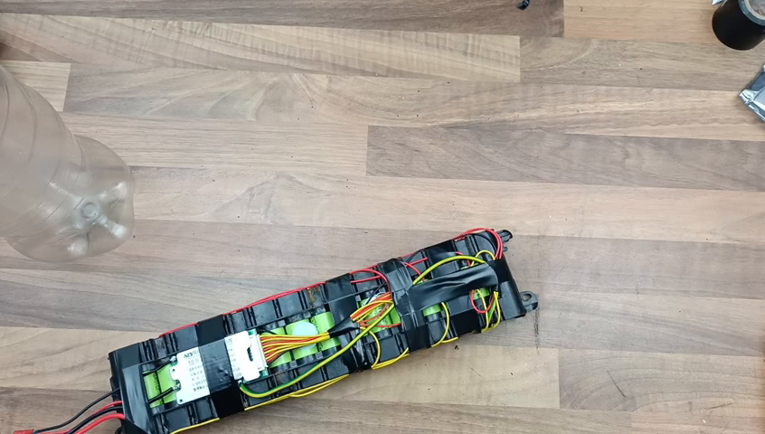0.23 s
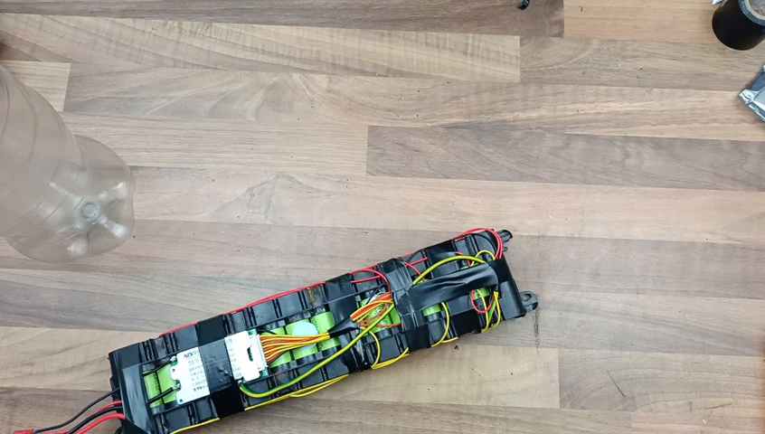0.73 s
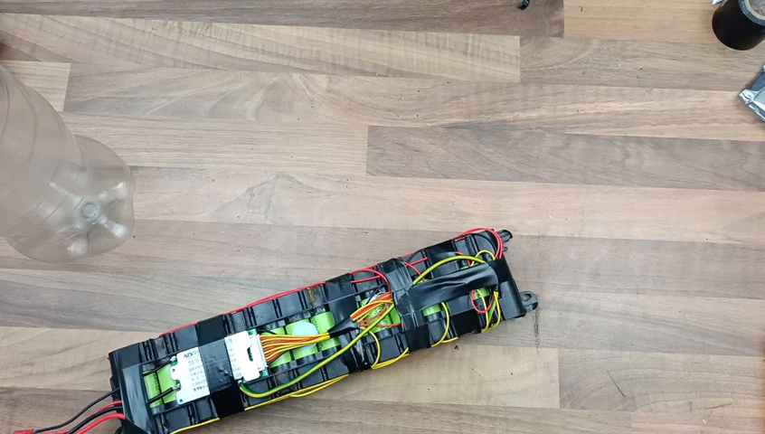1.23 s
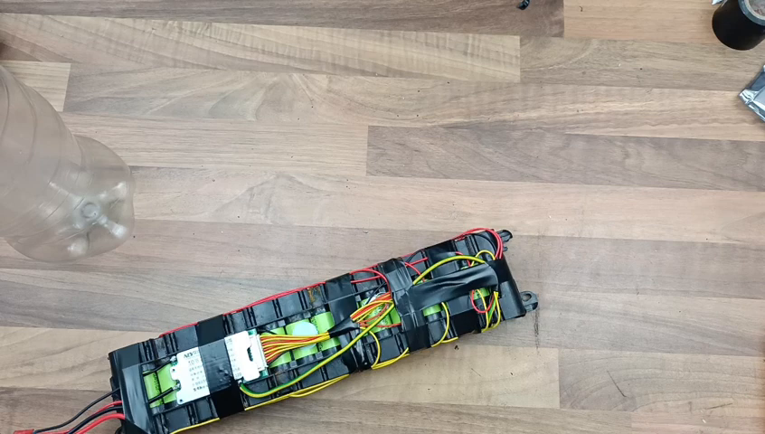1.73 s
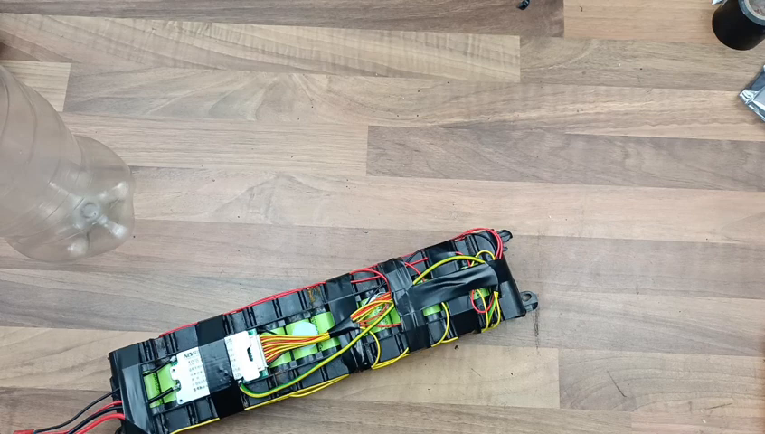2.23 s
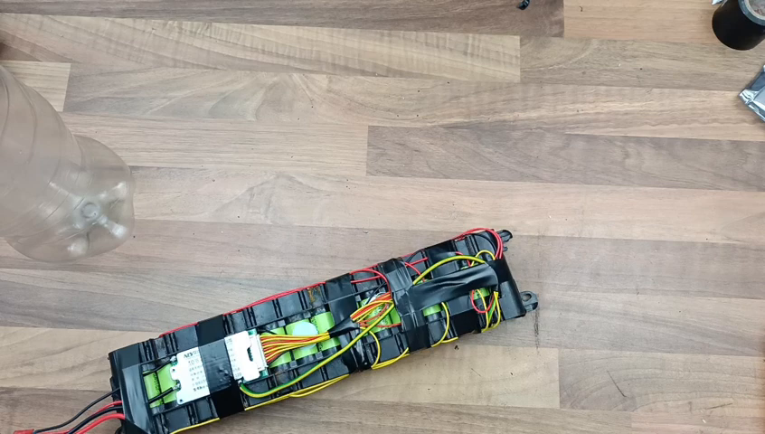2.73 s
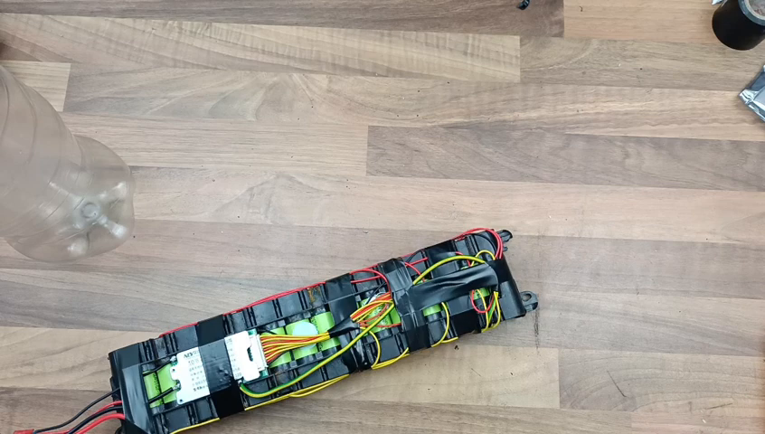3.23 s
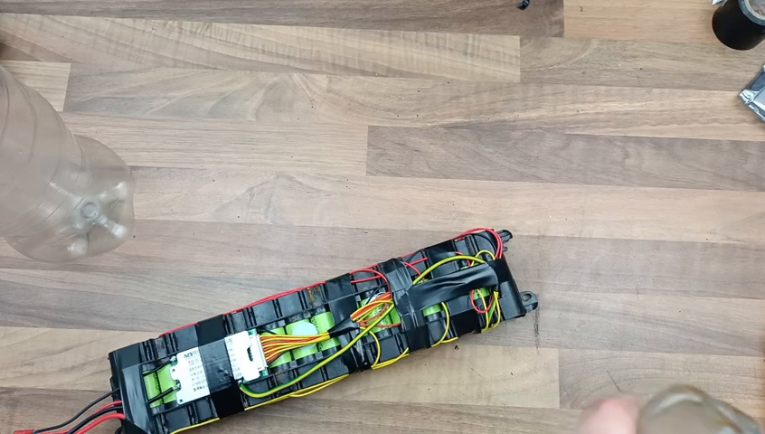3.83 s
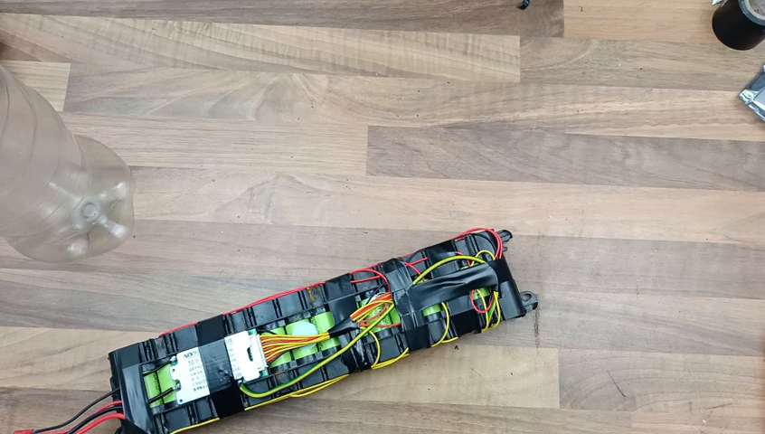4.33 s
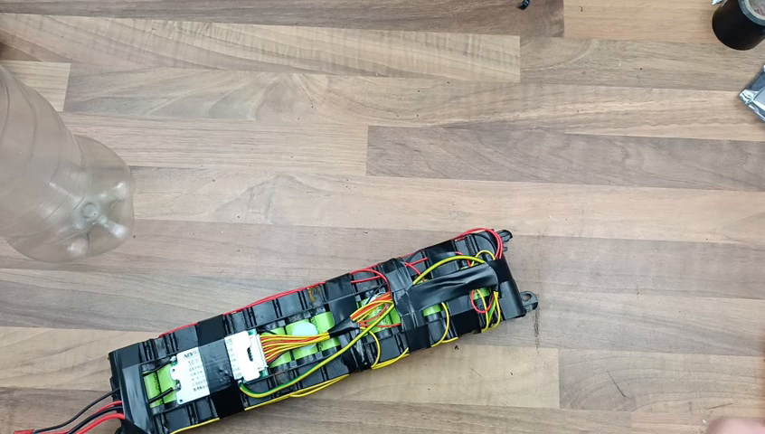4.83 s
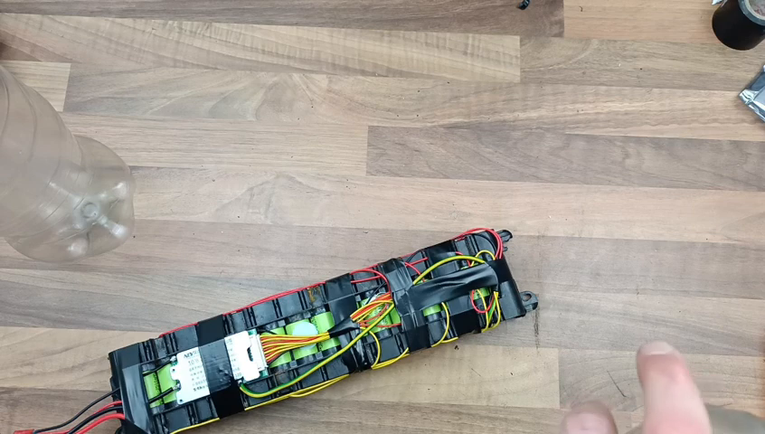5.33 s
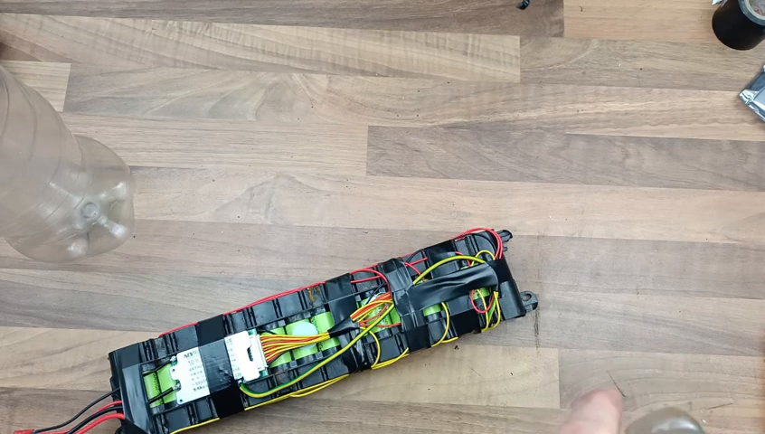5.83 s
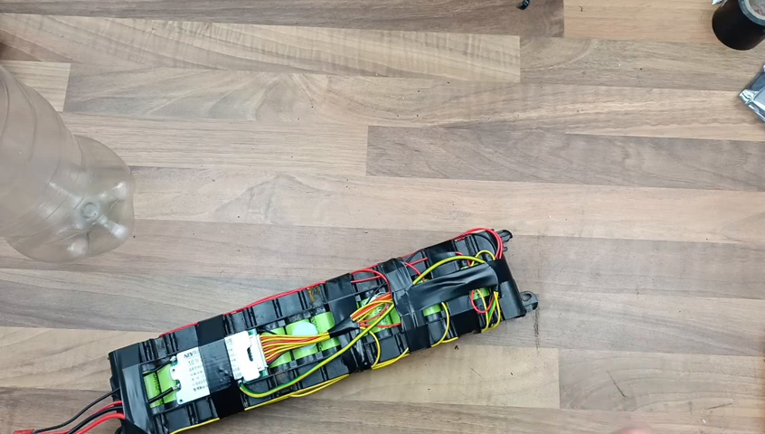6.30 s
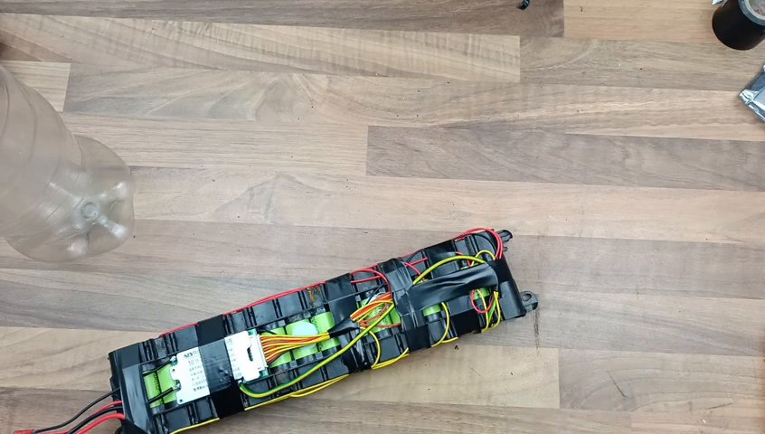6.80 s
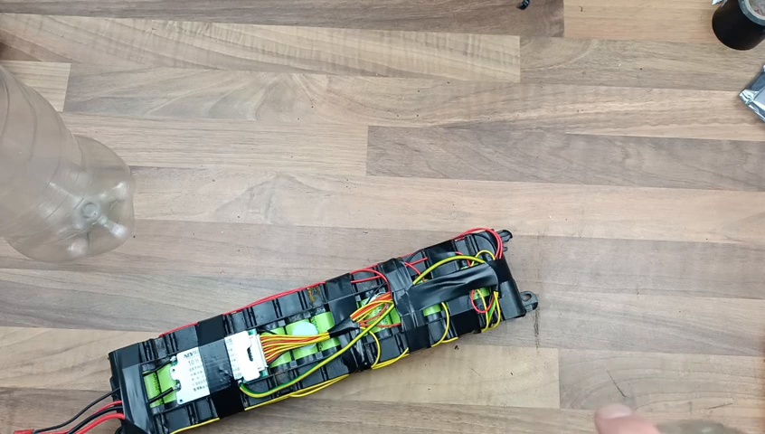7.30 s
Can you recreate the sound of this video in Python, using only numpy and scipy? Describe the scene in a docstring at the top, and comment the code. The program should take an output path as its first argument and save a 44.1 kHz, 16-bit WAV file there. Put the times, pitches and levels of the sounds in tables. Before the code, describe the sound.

A hand squeezes a thin plastic bottle close by, dents cracking sharply and popping hollow in irregular bursts, with crinkly rubbing and quiet gaps between.

```python
"""Squeezing a thin plastic bottle

A hand squeezes the bottle a little to the right of two microphones in a small, quiet room.
Dents snap in and out: dying wall tones crack, the belly booms, filtered noise fizzes.
Random tiny slips make the rubbing and creaking of fingers; some dents also puff low air.
Sparse echoes give a short tail, over a drifting noise hush and faint steady tones."""
import sys
import numpy as np
from scipy import signal
from scipy.fft import rfft, irfft, next_fast_len
from scipy.io import wavfile
from scipy.ndimage import uniform_filter1d

SR = 44100
rng = np.random.default_rng(int(sys.argv[2]) if len(sys.argv) > 2 else 0)


def voltage_ratio(decibels):
    """Convert decibels (scalar or array-like) to amplitude ratios, 20 dB per decade."""
    exponent = np.asarray(decibels, float) / 20
    return 10 ** exponent


def transcribe(signal):
    """Save signal, clipped to [-1, 1], as a 16-bit WAV file at the path in sys.argv[1]."""
    frames = np.atleast_2d(signal).T
    limited = np.clip(frames, -1, 1)
    pcm = np.round(limited * 32767).astype(np.int16)
    wavfile.write(sys.argv[1], SR, pcm)


N = 333396  # length of the scene in samples
ONSET = 350  # samples at the start of a snap or puff that set its level


def evened(x, size=None):
    """Scales to rms 1 over the first size samples."""
    return x / np.sqrt(np.mean(x[..., :size] ** 2) + 1e-20)


def read(points, hz):
    """Reads a table between its points on a log-frequency axis."""
    point_hz, value = np.transpose(points)
    return np.interp(np.log(hz + 1), np.log(point_hz + 1), value)


def colour(x, points):
    """Makes some pitches louder and others softer, by a table of (pitch_hz, level_db)."""
    length = x.shape[-1]
    size = next_fast_len(length)
    gain = voltage_ratio(read(points, np.fft.rfftfreq(size, 1 / SR)))
    return irfft(rfft(x, size) * gain, size)[..., :length]


def rise(t, s):
    """Smooth start over s seconds."""
    return np.sin(np.pi / 2 * np.minimum(t / s, 1)) ** 2


def ring(hz, db, t60, phase, t):
    """Sums dying tones, each falling 60 dB in t60 seconds; phase has one row a microphone."""
    turning = np.exp(np.outer(2j * np.pi * hz - np.log(1000) / t60, t))
    return ((voltage_ratio(db) * np.exp(1j * phase)) @ turning).imag


def without_bass(x):
    """Takes away the deep bass below about 150 Hz."""
    return signal.sosfilt(signal.butter(2, 150, "high", fs=SR, output="sos"), x)


def add(mix, s, sound):
    """Mixes a two-channel sound in at time s."""
    part = mix[:, round(s * SR):][:, :sound.shape[1]]
    part += sound[:, :part.shape[1]]


# colour of the hush: pitch_hz, level_db (relative, per Hz)
HUSH_COLOUR = [(18, -41.5), (30, -14.5), (100, 1.5), (160, -9.5), (500, -11.5), (900, -12.5), (1300, -19),
               (3300, -27.5), (4300, -32.5), (7300, -41), (8520, -34), (11500, -37.5), (15000, -43.5),
               (16200, -53.5)]
# how alike the hush is left and right: pitch_hz, likeness (-1 to 1)
HUSH_LIKENESS = [(60, -0.4), (300, 0.24), (1400, -0.13)]
# faint steady tones of electronics: pitch_hz, level_db
WHINE = [(8263, -93), (8800, -97), (9400, -95), (10643, -96)]


def quiet_air():
    """The hush of the room is noise with drifting patches; electronics add faint steady tones."""
    hush_db = -63.5
    frames, hz = N // 256 + 5, np.fft.rfftfreq(1024, 1 / SR)
    a, b, c, d, patches = rng.standard_normal((frames, 513, 5)).T
    # smoothing over pitch, then over time, turns single dots into patches
    patches = evened(uniform_filter1d(uniform_filter1d(patches, 12, 0), 14, 1))
    same = np.clip(read(HUSH_LIKENESS, hz), -1, 1)[:, None]
    left = a + 1j * b
    right = same * left + np.sqrt(1 - same ** 2) * (c + 1j * d)
    gain = voltage_ratio(read(HUSH_COLOUR, hz)[:, None] + 2.0 * patches)
    hush = signal.istft(np.array([left, right]) * gain, nperseg=1024, noverlap=768)[1][:, :N]
    t = np.arange(N) / SR
    tones = sum(voltage_ratio(db) * np.sqrt(2) * np.sin(2 * np.pi * f * t) for f, db in WHINE)
    return voltage_ratio(hush_db) * evened(hush) + tones


def slips(per_s, spread_db, clumps):
    """Tiny random stick-slips in clumps, a few much larger, some heard on both sides, some on one."""
    spread = np.minimum(rng.exponential(1, (3, N)), 4)
    size = voltage_ratio(spread_db * spread) * rng.choice([-1., 1.], (3, N))
    both, *own = size * (rng.random((3, N)) < clumps * per_s / SR)
    return both + 1.2 * np.array(own)


# the bottle's belly and the air in it, before damping and detuning: pitch_hz, level_db, t60_s
BELLY = [(271, -0.5, 0.26), (278.8, 1.5, 0.94), (337, 9.5, 0.13), (430, 4.5, 0.12), (642, 3, 0.02),
         (651, 9, 0.096), (870, 2.5, 0.17), (789.6, 7, 0.17), (1010, 1, 0.15), (1140, -1.5, 0.092)]
# colour of slips of the broad panels: pitch_hz, level_db
CREAK = [(600, -27), (900, 0.5), (1500, 0), (2200, -10.5), (4000, -36.5)]
# colour of slips of the tight creases: pitch_hz, level_db
CRUNCH = [(1200, -7.5), (2200, 1.5), (2900, 5.5), (3800, -2.5), (4500, -7), (7000, -29)]
# colour of the finest crackle, in rubs and snaps: pitch_hz, level_db
FIZZ = [(2650, -24.5), (4500, -1.5), (6490, -6), (7370, -3.5), (9020, -4.5), (11200, -20), (14800, -18.5),
        (16000, -29.5)]
# strokes of the fingers: peak_s, effort_db, hiss_db, swell_s, fade_s
STROKES = [(0.305, -19.5, -39.5, 0.083, 0.11), (1.214, -36.5, -81, 0.0061, 0.08),
           (1.342, -51, -66, 0.037, .03), (1.384, -46, -69.5, 0.1, 0.054), (1.28, -56, -62.5, .03, 0.046),
           (1.49, -56.5, -80.5, 0.094, 0.19), (1.61, -59, -90, .03, 0.038), (2.019, -29, -50.5, 0.03, .02),
           (2.282, -51, -83, 0.15, 0.026), (2.69, -49.5, -72, 0.22, 0.047),
           (3.287, -19, -36.5, 0.0096, 0.14), (4.171, -37, -74, 0.024, .3), (4.249, -43.5, -62, 0.17, .25),
           (4.398, -37, -58, 0.048, 0.17), (4.507, -42, -50, 0.024, 0.17), (4.787, -27, -35, 0.01, .12),
           (4.9, -40, -70, .15, .15), (4.967, -35, -61.5, 0.13, .01), (5.102, -38, -46, 0.015, 0.22),
           (5.158, -31, -54, 0.075, .1), (6.15, -30, -58, 0.057, 0.033), (6.301, -29, -53, 0.027, .11),
           (6.415, -36, -58, 0.067, .035), (6.469, -25, -47, 0.026, 0.15), (6.507, -19.5, -35, 0.046, .1),
           (6.55, -18, -37.5, 0.066, 0.089), (6.208, -50, -86.5, 0.02, 0.039),
           (5.828, -33.5, -69.5, 0.017, 0.069), (6.76, -40.5, -71, 0.089, .07),
           (6.935, -35.5, -58.5, 0.13, .01), (6.992, -28.5, -50, 0.013, 0.34),
           (7.149, -25, -44.5, 0.25, .3), (7.393, -22, -53, 0.047, .1), (7.451, -20, -32, 0.11, 0.13)]


def rubbing():
    """Slips of skin and plastic drive the belly, the panels, the creases and a dry hiss."""
    t, tap_t = np.arange(N) / SR, np.arange(4000) / SR
    # one crease sets off the next
    clumps = np.exp(0.45 * evened(uniform_filter1d(rng.standard_normal(N), 250)))

    # a slip rings the belly for a quarter of its full time, with its high notes favoured
    belly_hz, db, t60 = np.transpose(BELLY)
    tilted_db = db + 3 * np.log2(belly_hz / 600)
    belly_tap = ring(belly_hz, tilted_db, 0.25 * t60, np.zeros((1, len(BELLY))), tap_t)
    belly_tap = belly_tap * rise(tap_t, 0.002)
    belly_slips = slips(200, 4, clumps).sum(0)[None]
    belly = evened(signal.oaconvolve(belly_slips, belly_tap)[:, :N])
    creak = evened(colour(slips(800, 4.5, clumps), CREAK))
    crunch = evened(colour(slips(1600, 4.5, clumps), CRUNCH))
    hiss = evened(colour(slips(4200, 2.0, clumps), FIZZ))

    # the hand never lies quite still on the plastic
    effort, hissing = np.full(N, voltage_ratio(-71)), np.full(N, voltage_ratio(-91.5))
    for peak_s, effort_db, hiss_db, swell_s, fade_s in STROKES:
        span = slice(round((peak_s - 2 * swell_s) * SR), round((peak_s + 2 * fade_s) * SR))
        away = np.maximum((peak_s - t[span]) / swell_s, (t[span] - peak_s) / fade_s) ** 1.24
        # one swelling or fading time from its peak, a stroke is down by these dB
        effort[span] = np.hypot(effort[span], voltage_ratio(effort_db - 30.5 * away))
        hissing[span] = np.hypot(hissing[span], voltage_ratio(hiss_db - 41 * away))

    # a dry, bright rub works the creases; a dull one rocks the belly
    dry_db = 20 * np.log10(hissing / effort) + 23.2
    stroke = belly * voltage_ratio(-7.0 - 0.41 * dry_db)
    stroke = stroke + creak * voltage_ratio(-9.5)
    stroke = stroke + crunch * voltage_ratio(-10.5 + 0.57 * dry_db)
    return without_bass(stroke * effort + hiss * hissing)


def wall_crack(crack_hz, t):
    """A flipping dent shakes the many tones of the thin wall that lie round its own pitch."""
    place, size, turn, skew = rng.standard_normal((4, 90))
    modes_hz = np.geomspace(650, 7000, 90) * np.exp(0.024 * place)
    octaves = np.log2(modes_hz / crack_hz)
    far_db = np.where(octaves > 0, 9.0, 7.0) * octaves ** 2 - 1.1 * octaves
    db = 2.2 * size - 26 * np.tanh(far_db / 26)  # the drop levels off at 26 dB
    # the two microphones see each tone a little differently
    phase = 0.75 * turn + 0.79 * np.outer([1, -1], skew)
    crack = ring(modes_hz, db, 0.039 * (2000 / modes_hz) ** 0.087, phase, t)
    crack = crack * rise(t, 1.32 / crack_hz)  # big dents flip slowly
    return crack * (1 + 5.3 * np.exp(-t / 0.00025))  # the flip itself is a sharp spike


def belly_boom(boom_hz, t):
    """A snap sets the belly and its air ringing, strongest near boom_hz."""
    detune, size, turn, skew = rng.standard_normal((4, len(BELLY)))
    belly_hz, db, t60 = np.transpose(BELLY)
    # the squeezed shape detunes the belly, its lowest notes least
    belly_hz = belly_hz * np.exp(0.05 * np.tanh(belly_hz / 600) ** 2 * detune)
    db = db + 2.5 * size - 16 * np.log2(belly_hz / boom_hz) ** 2
    phase = 1.9 * turn + 0.03 * np.outer([1, -1], skew)
    belly = ring(belly_hz, db, t60, phase, t) * rise(t, 0.54 / boom_hz)
    return belly * (1 + 4.0 * np.exp(-t / 0.0065))  # the gripping hand soon damps the boom


def crease_fizz(t):
    """Creases fizz as bright noise that dies fast, then slower."""
    both, left, right = rng.standard_normal((3, len(t)))
    fade = voltage_ratio(-60 * t / 0.033) + 0.25 * voltage_ratio(-60 * t / 0.092)
    return colour((both + 6.3 * np.array([left, right])) * fade, FIZZ)


def snap(crack_db, crack_hz, belly_db, boom_hz, fizz_db):
    """A dent flips: its wall cracks, the belly booms, creases fizz."""
    t = np.arange(3000) / SR
    sound = voltage_ratio(crack_db) * evened(wall_crack(crack_hz, t), ONSET)
    sound = sound + voltage_ratio(belly_db) * evened(belly_boom(boom_hz, t), ONSET)
    sound = sound + voltage_ratio(fizz_db) * evened(crease_fizz(t), ONSET)
    return without_bass(sound * rise(t[::-1], 0.012))  # fades out smoothly at the end


# dents cracking sharply: start_s, crack_db, dent_hz, belly_db, fizz_db
CRACKS = [(0.0027, -9.5, 1523, -9, -30), (0.2544, -17.5, 2587, -33, -40), (0.2739, -9.5, 2326, -20.5, -19),
          (0.2905, -24.5, 2950, -41, -43.5), (0.3061, -12.5, 2473, -39.5, -22),
          (0.319, -15.5, 2677, -16.5, -30.5), (0.469, -15.5, 2175, -28.5, -25.5),
          (0.535, -19, 2315, -48.5, -58), (0.669, -15, 2342, -22, -17), (0.71, -22.5, 1260, -19, -31),
          (0.743, -24.5, 1525, -30, -44.5), (0.9022, -18.5, 1600, -22.5, -48.5),
          (1.1179, -12.5, 2470, -32, -42.5), (1.1967, -30, 880, -27, -74), (1.763, -26.5, 2037, -29.5, -47),
          (1.769, -21, 1490, -32, -60), (1.7995, -29, 1620, -30.5, -75.5), (2.324, -17, 2510, -23, -22),
          (3.179, -65.5, 2490, -66.5, -89.5), (3.239, -12, 2400, -20, -32), (3.2705, -9.5, 2392, -17, -22),
          (3.422, -21.5, 885, -26, -67), (3.446, -13, 2803, -30, -27.5), (3.5103, -7.5, 2333, -53, -27),
          (3.6539, -10, 2265, -22, -51.5), (3.6774, -11.5, 1600, -51, -43.5),
          (3.6943, -15.5, 1910, -24.5, -58), (3.908, -60.5, 2200, -66, -74),
          (4.088, -57, 2180, -54.5, -76.5), (4.1559, -36, 1050, -38, -71.5),
          (4.2374, -24.5, 1760, -31.5, -49.5), (4.319, -42.5, 2480, -41.5, -56),
          (4.4893, -15.5, 1006, -17.5, -58.5), (4.507, -44.5, 2960, -48.5, -37.5),
          (4.634, -15, 2906, -21.5, -20), (4.674, -11.5, 2782, -24, -18), (4.7076, -27, 2210, -36, -47),
          (4.7252, -15.5, 2128, -30.5, -25.5), (4.7353, -21.5, 2218, -39.5, -40),
          (4.7721, -17.5, 2580, -32, -26), (4.9413, -41.5, 1840, -53, -57.5),
          (4.9773, -11, 1833, -25.5, -34.5), (5.0036, -19, 2970, -23.5, -31),
          (5.0164, -12.5, 1710, -20.5, -29), (5.061, -12.5, 2332, -23.5, -23.5),
          (5.0697, -20.5, 2890, -41, -28.5), (5.149, -30.5, 1137, -45, -70), (5.159, -25.5, 1094, -40, -70),
          (5.1739, -14.5, 1250, -55, -54), (5.249, -13, 2700, -49.5, -20), (5.261, -11.5, 1857, -26, -27),
          (5.388, -13.5, 1082, -22.5, -58), (5.433, -31, 2483, -59.5, -43.5), (5.4433, -34, 2543, -49, -37),
          (5.466, -5.5, 2185, -22, -30.5), (5.4836, -10.5, 1674, -45, -20.5),
          (5.491, -18, 1935, -18, -24.5), (5.8199, -42, 2690, -53, -65), (6.293, -26.5, 2480, -25, -51),
          (6.2985, -43.5, 2685, -33.5, -58.5), (6.319, -26.5, 1316, -32, -65.5),
          (6.3296, -29, 2260, -34, -61), (6.456, -40, 1250, -37, -71), (6.4645, -32, 1000, -43, -66),
          (6.4972, -24, 2830, -46, -42.5), (6.511, -34, 2870, -48, -51.5), (6.5325, -17, 2500, -34, -45),
          (6.548, -28.5, 3300, -36, -47), (6.798, -66, 2520, -60, -62), (6.851, -62, 2030, -55, -55),
          (6.923, -39, 1470, -46, -52), (6.9501, -11.5, 2284, -21.5, -28),
          (6.9629, -10.5, 1532, -36, -34.5), (7.089, -7.5, 1530, -27, -33),
          (7.1007, -14, 2060, -44.5, -24.5), (7.1184, -19, 2094, -35, -44.5),
          (7.1301, -20.5, 1867, -29, -30), (7.2105, -16.5, 3820, -27, -26.5),
          (7.2871, -11, 1193, -25.5, -54.5), (7.412, -25.5, 2212, -29, -35.5),
          (7.4803, -13, 2755, -19, -19.5)]


def add_cracks(bottle):
    """Sharp dents crack at their own pitch while the belly booms round 493 Hz."""
    for start_s, crack_db, dent_hz, belly_db, fizz_db in CRACKS:
        add(bottle, start_s, snap(crack_db, dent_hz, belly_db, 493, fizz_db))


# broad panels popping with a dull knock: start_s, belly_db, boom_hz, tick_db
KNOCKS = [(0.0441, -14.5, 493, -27), (0.288, -21.5, 750, -38), (0.3057, -11, 740, -37),
          (0.4902, -19.5, 530, -24.5), (1.0825, -39.5, 327, -50), (1.8689, -43.5, 430, -63.5),
          (2.026, -27.5, 650, -37), (2.249, -52.5, 600, -64), (2.3007, -28.5, 465, -39),
          (2.5452, -42.5, 430, -55.5), (2.588, -49, 320, -70), (2.6611, -46, 490, -56),
          (2.696, -46.5, 430, -52), (3.0484, -34.5, 343, -53), (3.122, -47.5, 350, -50),
          (3.352, -22.5, 310, -26), (3.6275, -34.5, 300, -41), (3.817, -47, 403, -47),
          (4.1797, -22.5, 327, -39), (4.2563, -27, 322, -34), (4.438, -35.5, 330, -50.5),
          (4.477, -26.5, 325, -32), (4.5553, -26.5, 346, -40), (4.866, -18, 360, -20),
          (5.6075, -27.5, 340, -35.5), (5.754, -57, 497, -69), (5.8189, -25, 367, -30.5),
          (6.0769, -47.5, 443, -61.5), (6.1483, -26.5, 530, -33), (6.207, -41.5, 450, -51.5),
          (6.2725, -34.5, 504, -40.5), (6.346, -28.5, 493, -32.5), (6.537, -17, 397, -41),
          (6.5986, -25, 540, -25.5), (6.7687, -22.5, 260, -53), (7.0437, -25.5, 467, -25.5),
          (7.062, -32, 503, -26), (7.171, -28, 566, -24), (7.231, -29.5, 620, -35),
          (7.273, -26.5, 587, -60)]


def add_knocks(bottle):
    """Broad panels pop: a boom with a low tick round 1250 Hz and a fizz 37 dB under the tick."""
    for start_s, belly_db, boom_hz, tick_db in KNOCKS:
        add(bottle, start_s, snap(tick_db, 1250, belly_db, boom_hz, tick_db - 37))


def puff(db):
    """A moving dent pushes one low gust of air, stronger at the near (right) microphone."""
    turn = 2 * np.pi * 95 * np.arange(3000) / SR  # a 95 Hz swing
    swing = np.sin(turn - np.array([[0.3], [-0.15]])) * turn * np.exp(-turn / 0.52)
    return voltage_ratio(db) * evened(voltage_ratio([[-3.0], [2.5]]) * swing, ONSET)


# low gusts of air with some of the snaps: start_s, level_db
PUFFS = [(0.273, -31.5), (0.669, -22.5), (2.026, -42.5), (2.3257, -41), (3.269, -28.5), (4.2389, -32),
         (4.6729, -20.5), (5.0704, -17.5), (5.2504, -19.5), (5.486, -34), (5.4929, -24.5), (7.4793, -32)]


def add_puffs(bottle):
    """Some of the snaps also push out a low gust of air."""
    for start_s, level_db in PUFFS:
        add(bottle, start_s, puff(level_db))


# how long the echoes take to fall 60 dB: pitch_hz, t60_s
ROOM_T60 = [(100, 0.023), (300, 0.25), (1000, 0.23), (3000, 0.22), (5000, 0.25), (8000, 0.28),
            (15000, 0.033)]


def room(x):
    """Three sets of sparse echoes take turns quickly, so moments of one snap trail differently."""
    size, wet = SR // 2, np.zeros((2, N))
    for k in range(3):
        # one echo at a random place in every 20 samples
        taps = np.zeros((2, size))
        at = np.arange(100, size - 20, 20) + rng.integers(0, 20, (2, (size - 101) // 20))
        np.put_along_axis(taps, at, rng.choice([-1., 1.], at.shape), 1)
        hz, t, z = signal.stft(taps, SR, nperseg=256)
        # how much of the tail both microphones share, by pitch
        shared = np.clip(read([(150, 0.1), (600, 1.0), (1500, 0.14)], hz), 0, 1)[:, None]
        z[1] = shared * z[0] + np.sqrt(1 - shared ** 2) * z[1]
        fade = voltage_ratio(-60 * t / read(ROOM_T60, hz)[:, None])
        tail = signal.istft(z * fade, SR, nperseg=256)[1]
        tail = tail / np.linalg.norm(tail[0])
        # the three shares swing in turn and always add up to the same power
        share = np.sqrt(2 / 3) * np.cos(np.pi * (np.arange(N) / SR * 60 + k / 3))
        wet += signal.oaconvolve((x * share)[None], tail, axes=1)[:, :N]
    return colour(wet, [(60, -9.5), (200, 4.0), (1000, -1.0), (3000, 2.5), (5000, 1.65),
                        (8000, -1.5), (15000, 2.5)])


def scene():
    """Snaps and rubbing reach the right microphone first, then come the room and its hush."""
    bottle = rubbing()
    add_cracks(bottle)
    add_knocks(bottle)
    add_puffs(bottle)
    # the far (left) microphone hears the bottle 8 samples later, with less treble
    left = colour(np.pad(bottle[0], (8, 0))[:N], [(5000, -0.82), (8000, -2.5)])
    direct = np.array([left, bottle[1] * voltage_ratio(-0.08)])
    return direct + voltage_ratio(-13.0) * room(bottle.mean(0)) + quiet_air()


def low_pass(x):
    """Removes everything above the highest recorded frequency."""
    return signal.sosfilt(signal.butter(12, 16490, fs=SR, output="sos"), x)


# colour of the microphones: pitch_hz, level_db
MICROPHONE = [(1300, -0.11), (1700, -2), (3000, 1.6), (3800, 1), (4300, -2), (6500, -3.5), (8000, 0.5)]


def record(dry):
    """Small microphones drop the deepest bass, peaks clip at full scale, the top treble is cut."""
    thinned = signal.sosfilt(signal.butter(3, 60, "high", fs=SR, output="sos"), dry)
    clipped = np.clip(colour(thinned, MICROPHONE), -1, 1)
    treble_cut = signal.firwin(255, 16450, window=("kaiser", 8), fs=SR)[None]
    finished = signal.oaconvolve(clipped, treble_cut, "same")
    return low_pass(finished)


dry = scene()
out = record(dry)
transcribe(out)
```